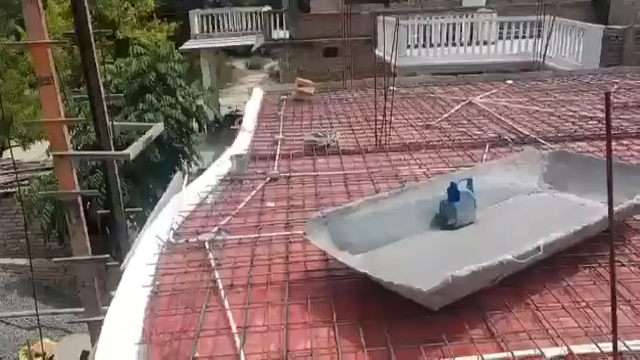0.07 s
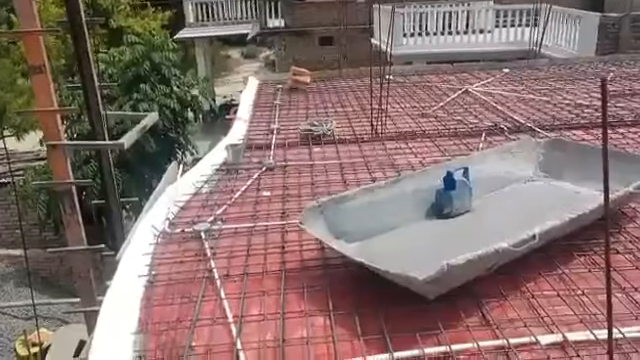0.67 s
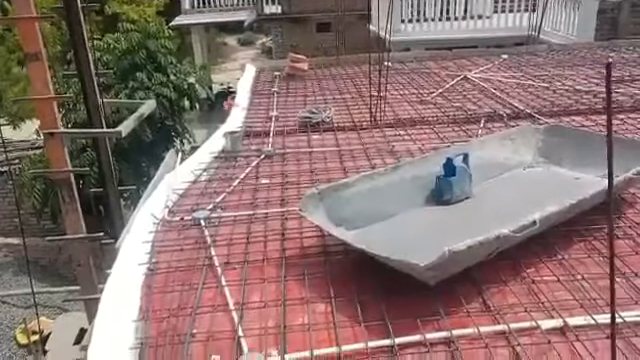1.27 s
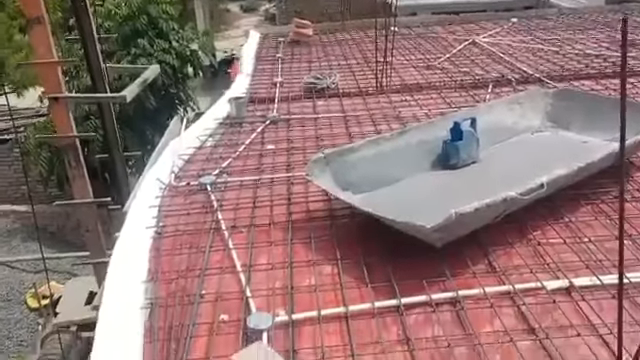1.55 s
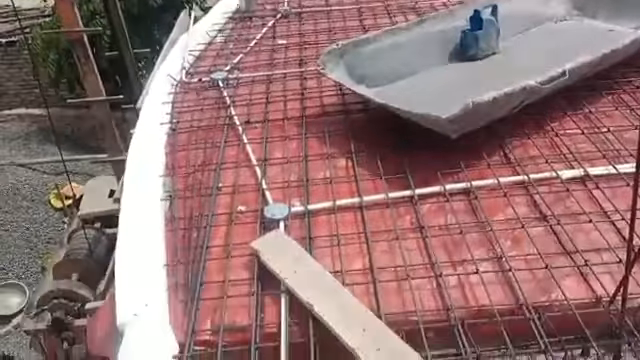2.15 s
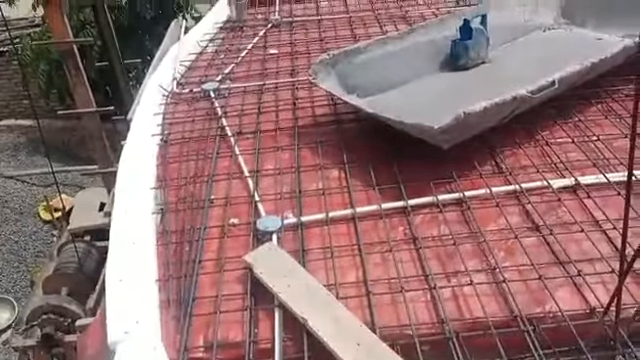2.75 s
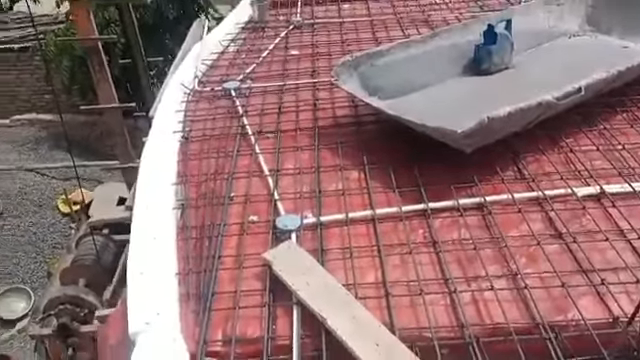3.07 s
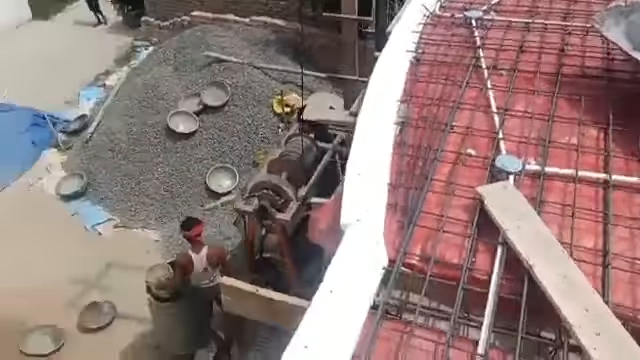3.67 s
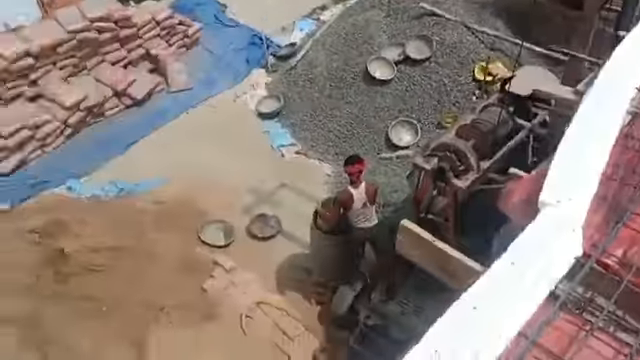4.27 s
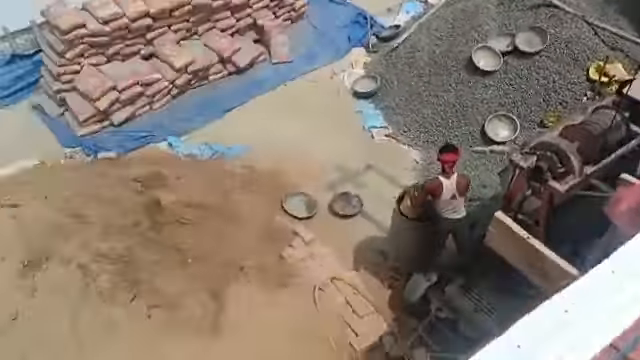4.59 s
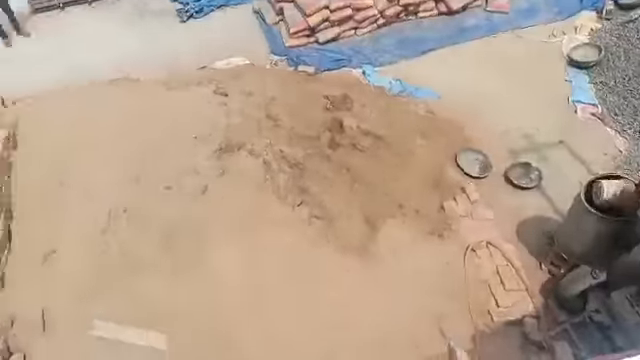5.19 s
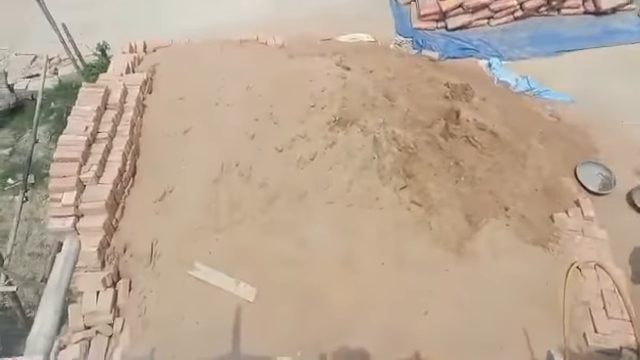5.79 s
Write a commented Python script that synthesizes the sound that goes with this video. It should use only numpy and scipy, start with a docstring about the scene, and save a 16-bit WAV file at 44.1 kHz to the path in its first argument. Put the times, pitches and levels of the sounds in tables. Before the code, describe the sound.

Gravel tumbles and clangs in a turning concrete mixer drum over the steady chug of a single-cylinder diesel.

```python
"""A drum concrete mixer works on a building site, heard from the roof above it.
Its slow single-cylinder diesel thuds and rattles: strokes knock the block, gas puffs through the silencer.
Wet gravel churns in the steel drum and keeps it ringing. Now and then a load of stones drops onto
the drum wall and slides down; house walls echo the drum."""
import sys
import numpy as np
from scipy import signal
from scipy.fft import rfft, irfft, next_fast_len
from scipy.io import wavfile

SR = 44100
rng = np.random.default_rng(int(sys.argv[2]) if len(sys.argv) > 2 else 0)


def put_to_file(sound):
    """Save the sound as 16-bit audio at rate SR, in the file named by the first command-line argument."""
    columns = np.atleast_2d(sound).T  # one column per channel
    safe = np.clip(columns, -1, 1)
    whole_steps = np.round(safe * 32767)
    wavfile.write(sys.argv[1], SR, whole_steps.astype(np.int16))


N = 257544
BURST = int(.8 * SR)  # samples in one impact or echo tail

# The loaded drum's booming shell and clanging wall. Each row: mode in Hz, width in Hz, level in dB.
SHELL_MODES = [(230, 20, -8), (305, 28, -0.5), (340, 33, -8), (420.6, 71, -3.5)]
WALL_MODES = [(590, 29, 7), (694, 26.5, 3), (802.4, 17, 6.5), (960, 91, 6.5), (1094, 30, 8.5),
              (1525, 130, 1), (1815, 52, -6.5), (2460, 41, -10.5)]
# Stones on stones and wet steel, and their sharp contact crack. Each row: frequency in Hz, level in dB.
STONE_SPECTRUM = [(300, -77), (700, 4.5), (1050, 5), (1300, -0.5), (1900, -1), (2600, -3), (3100, -6),
                  (3700, -15), (7000, -62), (15000, -81)]
CRACK_SPECTRUM = [(1500, -14.5), (3000, -2.5), (4200, -4), (5400, -3.5), (7200, -9.5), (9200, 0.5),
                  (11000, -7.5), (13000, -14), (15500, -50)]


def engine(firing_hz=11.8, sag_hz=.28, settle_s=2.3, puff_cycles=0.8,
           gas_db=-32, rattle_db=-31, hiss_db=-56):
    """The diesel knocks, puffs gas through its silencer, rattles, and hisses twice a cycle."""
    # Silencer and engine housing. Each row: resonance in Hz, width in Hz, level in dB.
    exhaust_modes = [(73.4, 2.1, -25), (84.4, 1.1, 9), (123.9, 4, 5), (149.5, 6, -5), (170, 4, -9),
                     (193, 15, -9), (225.7, 11, -1.5), (300, 1.3, 0), (351.7, 11, -4), (380, 12.8, -0.5),
                     (426.3, 8, 2)]
    # Valve gear, belt and ring gear. Each row: frequency in Hz, level in dB.
    rattle_spectrum = [(25, -25), (45, -33), (75, 3.5), (160, -1), (420, -7), (500, -4.5), (720, -8),
                       (1100, -14), (2400, -14.5), (3700, -28.5), (9000, -40.5), (15000, -67)]
    t = np.arange(N) / SR
    cycles = np.cumsum(firing_hz + sag_hz * np.exp(-t / settle_s)) / SR  # slows under load, then settles
    strength = firing_strength(cycles.astype(int))
    puff = strength * np.exp(-(cycles % 1) / puff_cycles)
    gas = unit(ring((puff + 0.26) * rng.standard_normal(N), exhaust_modes))
    rattle = unit(colour((1 + 0.29 * puff) * rng.standard_normal(N), rattle_spectrum))
    hiss_pulse = np.cos(2 * np.pi * (cycles - 0.15)) ** 2
    hiss = unit(colour(hiss_pulse * rng.standard_normal(N), CRACK_SPECTRUM))
    knock = block_knock(cycles, strength)
    return knock + amp(gas_db) * gas + amp(rattle_db) * rattle + amp(hiss_db) * hiss


def block_knock(cycles, strength, decay_cycles=0.079):
    """Each stroke of the cycle strikes the block and chatters briefly."""
    # Engine block and frame. Each row: mode in Hz, width in Hz, level in dB.
    block_modes = [(82.6, 13, -1), (131, 18, -3.5), (203.6, 32, 3.5), (233, 14.3, 4.5), (300, 50, -3),
                   (397, 44, 2.5)]
    # Blows of exhaust, combustion, piston slap and valve gear. Each row: place in the cycle from 0 to 1,
    # level in dB, ring centre in Hz, ring spread in octaves, roughness from 0 to 1.
    strokes = [(.926, -41.5, 72, 0.23, .8), (.153, -33, 167, .12, .45), (.217, -40.5, 403, 0.27, 1),
               (.298, -37.5, 262, 0.2, .7), (.46, -39.5, 298, 0.62, 0.9), (.666, -40, 154, 0.52, .5),
               (.868, -43.5, 226, .47, 0.77)]
    out = np.zeros(N)
    for place, db, hz, octaves, roughness in strokes:
        phase = cycles + 1 - place
        hits = unit(np.diff(phase.astype(int), prepend=int(phase[0])) * strength)
        chatter = unit(strength * np.exp(-(phase % 1) / decay_cycles) * rng.standard_normal(N))
        out += amp(db) * unit(ring(hits + roughness * chatter, struck(block_modes, hz, octaves)))
    return out


def firing_strength(cycle, scatter_db=1.26):
    """Firings vary a little from cycle to cycle; a few hit harder and one falls weak."""
    # Firings that stand out. Each row: time in seconds, level change in dB.
    accents = [(1.02, 2.5), (2.45, 2), (2.53, -3.5), (3.04, 3.5), (3.2, 4.5), (3.29, 5), (3.71, 5),
               (4.89, 4.5), (4.98, 3.5), (5.74, 3.5)]
    db = scatter_db * rng.standard_normal(N)[cycle]
    for when, extra_db in accents:
        db += extra_db * (cycle == cycle[int(when * SR)])
    return amp(db)


def falls(boom_rise_s=0.00864, rise_s=0.018, shell_s=0.037, wall_s=0.04, scrape_lead_s=0.013):
    """A load scrapes loose and lands: the shell booms, the wall clangs, stones clash, gravel slides."""
    # Falling loads. Each row: start in seconds; shell level in dB; wall level in dB, centre in Hz,
    # spread in octaves; stone level in dB, centre in Hz, spread in octaves, decay in seconds;
    # crack level in dB; slide lag in seconds, level in dB, decay in seconds.
    loads = [(0.576, -23.5, -23.5, 750, 0.11, -21.5, 1710, 1.7, 0.046, -33.5, 0.076, -29.5, 0.11),
             (1.430, -19, -19.5, 717, 0.15, -23, 2670, 0.5, 0.046, -31.5, 0.078, -34.5, 0.36),
             (1.949, -26.5, -25, 610, 0.26, -29.5, 2550, 1.4, 0.057, -39, 0.05, -33.5, 0.058),
             (2.715, -28.5, -45, 920, 0.52, -30.5, 1950, 2.2, 0.05, -46, 0.076, -52, .058),
             (3.118, -22.5, -26, 720, 0.27, -23, 1820, 0.47, 0.074, -34.5, 0.072, -31.5, 0.068),
             (3.758, -19, -27, 775, 0.85, -24, 1860, 1.1, 0.074, -34.5, 0.073, -28, 0.095),
             (4.306, -20.5, -25.5, 673, 0.23, -26.5, 2060, 0.74, 0.091, -32.5, 0.073, -25.5, 0.038),
             (5.110, -19, -22, 684, 0.18, -21.5, 2150, 0.58, 0.035, -35, .086, -26.5, 0.065)]
    out = np.zeros(N)
    # the bulk of the load lands as one lump, ahead of the loose stones
    thump = 0.55 * np.sqrt(SR * shell_s) * signal.unit_impulse(BURST, int(boom_rise_s * SR))
    for (start, shell_db, wall_db, wall_hz, wall_octaves, stones_db, stones_hz, stones_octaves, stones_s,
         crack_db, lag_s, slide_db, slide_s) in loads:
        boom = blow(thump + surge(boom_rise_s, shell_s), SHELL_MODES)
        clang = blow(surge(rise_s, wall_s), struck(WALL_MODES, wall_hz, wall_octaves))
        stones = colour(surge(rise_s, stones_s), STONE_SPECTRUM, stones_hz, stones_octaves)
        crack = colour(surge(rise_s=0.03, decay_s=0.046), CRACK_SPECTRUM)
        add(out, start, amp(shell_db) * boom + amp(wall_db) * clang + amp(stones_db) * stones)
        add(out, start - scrape_lead_s, amp(crack_db) * crack)
        add(out, start + lag_s, amp(slide_db) * slide(slide_s))
    return out


def slide(decay_s, rise_s=0.018, centre_hz=1880, grit_db=-21, octaves=0.65):
    """Loose gravel rushes down the drum wall with a gritty edge."""
    grains = surge(rise_s, decay_s)
    rush = colour(grains, STONE_SPECTRUM, centre_hz, octaves)
    return rush + amp(grit_db) * colour(grains, CRACK_SPECTRUM)


def churn(gravel_db=-34, fade_db_per_s=0.74, grit_db=-50.5, wall_db=-41, shell_db=-38,
          facing_db=3, facing_s=4, facing_width_s=0.58):
    """Gravel tumbles without pause, hissing and keeping the drum ringing as its clinking slowly fades."""
    t = np.arange(N) / SR
    # the gritty hiss lifts while the listener faces the drum
    facing = np.exp(-((t - facing_s) / facing_width_s) ** 2)
    tumble = waver(per_s=17, depth_db=1.5)
    flicker = waver(per_s=22, depth_db=2.2)
    gravel = tumble * unit(colour(pebbles() + patter(per_s=1000, spread_db=9), STONE_SPECTRUM))
    grit = colour(flicker * patter(per_s=3800, spread_db=2.5), CRACK_SPECTRUM)
    wall = ring(tumble * patter(per_s=880, spread_db=4), WALL_MODES)
    shell = ring(patter(per_s=120, spread_db=6.5), SHELL_MODES)
    return (amp(gravel_db - fade_db_per_s * t) * gravel + amp(grit_db + facing_db * facing) * grit
            + amp(wall_db) * wall + amp(shell_db) * shell)


def pebbles(per_s=450, low_hz=500, high_hz=3300, decay_s=0.017, range_db=13.8):
    """Each pebble rings some patch of the steel for a moment, at its own pitch; rms 1."""
    out = np.zeros(N)
    age = np.arange(SR // 10) / SR
    for when, pitch, size in rng.random((int(per_s * N / SR), 3)):
        hz = low_hz + pitch * (high_hz - low_hz)
        clink = np.sin(2 * np.pi * hz * age) * np.exp(-age / decay_s)
        add(out, when * N / SR, amp(range_db * size) * clink)
    return unit(out)


def lumps(rise_s=0.0038, decay_s=0.01, octaves=0.18):
    """A lump of wet mix drops off a blade and thumps the shell."""
    # Lumps landing. Each row: start in seconds, level in dB, ring centre in Hz.
    thumps = [(2.058, -20.5, 340), (2.785, -22.5, 300), (3.592, -22.5, 410), (3.783, -16, 340),
              (4.343, -17, 230), (4.375, -20, 316), (4.645, -25, 370), (5.161, -26, 380)]
    out = np.zeros(N)
    for start, db, hz in thumps:
        add(out, start, amp(db) * blow(surge(rise_s, decay_s), struck(SHELL_MODES, hz, octaves)))
    return out


def knocks(rise_s=0.0036, decay_s=0.015, octaves=0.12):
    """A big stone lands and chatters briefly on the wall."""
    # Single stones landing. Each row: start in seconds, level in dB, ring centre in Hz.
    landings = [(0.645, -23.5, 663), (0.725, -25, 720), (1.443, -21.5, 990), (1.485, -25, 960),
                (1.585, -25.5, 954), (1.845, -29, 780), (2.225, -28, 710), (3.295, -25, 960),
                (3.45, -25.5, 870), (5.19, -27, 680), (5.52, -28.5, 610), (5.735, -25, 610)]
    out = np.zeros(N)
    for start, db, hz in landings:
        add(out, start, amp(db) * blow(surge(rise_s, decay_s), struck(WALL_MODES, hz, octaves)))
    return out


def clashes(rise_s=.004, decay_s=0.018, octaves=0.18):
    """A big stone hits the others with a short, bright clack."""
    # Stone-on-stone hits. Each row: start in seconds, level in dB, centre in Hz.
    clacks = [(0.585, -24, 900), (0.789, -30, 2390), (1.442, -26, 2530), (3.128, -21.5, 1930),
              (3.172, -27.5, 1890), (3.197, -26.5, 2050), (3.776, -27, 1030), (3.846, -27.5, 2260),
              (4.385, -32, 1860), (5.12, -20.5, 2200), (5.187, -23.5, 2340), (5.309, -31, 2260)]
    out = np.zeros(N)
    for start, db, hz in clacks:
        add(out, start, amp(db) * colour(surge(rise_s, decay_s), STONE_SPECTRUM, hz, octaves))
    return out


def trickles():
    """Between the loads, handfuls of gravel scrape down the wall."""
    # Small slides. Each row: start in seconds, level in dB, centre in Hz, decay in seconds.
    handfuls = [(1.315, -30.5, 1470, 0.11), (2.755, -32, 1100, 0.078), (2.943, -36, 1880, 0.088),
                (3.235, -36.5, 2400, 0.048), (3.324, -33, 1780, 0.014), (3.569, -29.5, 1710, 0.028),
                (4.95, -36, 1350, 0.11), (5.559, -49, 1250, 0.4)]
    out = np.zeros(N)
    for start, db, hz, decay_s in handfuls:
        add(out, start, amp(db) * slide(decay_s, centre_hz=hz, grit_db=-18))
    return out


def squeaks(width_hz=90, rise_s=0.0049):
    """Dry friction excites one high mode of the steel, faintly."""
    # Stones on bare steel. Each row: start in seconds, pitch in Hz, level in dB, decay in seconds.
    scratches = [(1.436, 4260, -31, 0.0093), (2.33, 4880, -51, 0.05), (2.959, 4880, -48, 0.1),
                 (5.192, 4370, -40, 0.008)]
    out = np.zeros(N)
    for start, hz, db, decay_s in scratches:
        add(out, start, amp(db) * blow(surge(rise_s, decay_s), [(hz, width_hz, 0)]))
    return out


def scrapes(rise_s=0.017, centre_hz=5000, octaves=0.43):
    """Grit hisses briefly as it is dragged along the drum."""
    # Grit on bare steel. Each row: start in seconds, level in dB, decay in seconds.
    drags = [(2.24, -48, 0.067), (2.72, -45, 0.052), (4.985, -45.5, .06), (5.37, -50, 0.033),
             (5.62, -47, 0.072)]
    out = np.zeros(N)
    for start, db, decay_s in drags:
        add(out, start, amp(db) * colour(surge(rise_s, decay_s), CRACK_SPECTRUM, centre_hz, octaves))
    return out


def yard(x, t60_s=0.54, wet_db=-8, gap_s=.018):
    """The walls around the site add scattered echoes."""
    t = np.arange(BURST) / SR
    echoes = rng.standard_normal(BURST) * amp(-60 * t / t60_s) * (t > gap_s)
    return x + amp(wet_db) * signal.fftconvolve(x, echoes / np.linalg.norm(echoes))[:N]


def patter(per_s, spread_db, size=N):
    """Random tiny impacts of uneven strength, rms 1."""
    strength = amp(spread_db * np.clip(rng.standard_normal(size), -2, 2))
    hits = rng.random(size) < per_s / SR
    return unit(hits * strength * np.sign(rng.standard_normal(size)))


def surge(rise_s, decay_s):
    """A pile of impacts builds up, then dies away."""
    age = np.arange(BURST) / SR
    attack = np.sin(np.minimum(age / rise_s, 1) * np.pi / 2) ** 2
    decay = np.exp(-np.maximum(age - rise_s, 0) / decay_s)
    return attack * decay * patter(per_s=5000, spread_db=1.5, size=BURST)


def waver(per_s, depth_db):
    """A gain that wanders at random, about per_s times a second."""
    knots = np.arange(N) / SR * per_s
    return amp(depth_db * np.interp(knots, np.arange(N), rng.standard_normal(N)))


def blow(drive, modes):
    """The modes ring with all the energy that the blow brings."""
    sound = ring(drive, modes)
    return sound * np.linalg.norm(drive) / np.linalg.norm(sound)


def struck(modes, centre_hz, octaves):
    """Where a blow lands decides which modes ring most."""
    return [(f, width, db + 20 * np.log10(focus(f, centre_hz, octaves))) for f, width, db in modes]


def ring(x, modes):
    """Drive damped resonances with x; little radiates outside their range."""
    low_hz, high_hz = 0.24 * modes[0][0], 1.14 * modes[-1][0]
    def response(hz):
        """Sum of the modes between steep edges."""
        edges = np.sqrt((1 + (low_hz / hz) ** 8) * (1 + (hz / high_hz) ** 8))
        # neighbouring modes swing against each other, so a blow swells rather than clicks
        return sum((-1) ** k * amp(db) / (1 + 1j * (hz / f - f / hz) * f / width)
                   for k, (f, width, db) in enumerate(modes)) / edges
    return shape(x, response)


def colour(x, points, centre_hz=1000, octaves=np.inf):
    """Give x a broad spectrum of (Hz, dB) points, gathered around a centre if asked."""
    f, db = np.transpose(points)
    return shape(x, lambda hz: amp(np.interp(np.log(hz), np.log(f), db)) * focus(hz, centre_hz, octaves))


def shape(x, response):
    """Filter by a function of frequency, keeping the power of a white input."""
    size = next_fast_len(len(x) + SR // 2, True)
    hz = np.maximum(np.arange(size // 2 + 1) * SR / size, 1)
    return irfft(rfft(x, size) * unit(response(hz)), size)[:len(x)]


def focus(hz, centre_hz, octaves):
    """A bell of gain around centre_hz."""
    return 1 / (1 + (np.log2(hz / centre_hz) / octaves) ** 2)


def add(out, start, burst):
    """Mix a burst in at its start in seconds."""
    part = out[int(start * SR):][:len(burst)]
    part += burst[:len(part)]


def amp(db):
    """Decibels to gain."""
    return 10 ** (np.asarray(db) / 20)


def unit(x):
    """Scale to rms 1."""
    return x / np.sqrt(np.mean(np.abs(x) ** 2))


def scene():
    """The engine, and the open drum sounding into the yard."""
    diesel = engine()
    drum = churn() + falls() + lumps() + trickles() + knocks() + clashes() + squeaks() + scrapes()
    return (diesel + yard(drum))[None]


def record(dry, start_s=0.49, fade_from_db=-3, fade_s=0.11, top_hz=14600):
    """The sound cuts in after a short silence and quickly reaches full level; the top treble is cut."""
    age = np.arange(N) / SR - start_s
    fade_in = amp(fade_from_db * (1 - np.clip(age / fade_s, 0, 1) ** 2))
    lowpass = signal.ellip(8, .2, 70, top_hz, fs=SR, output="sos")
    return signal.sosfilt(lowpass, dry * (age >= 0) * fade_in)


dry = scene()
out = record(dry)
put_to_file(out)
```